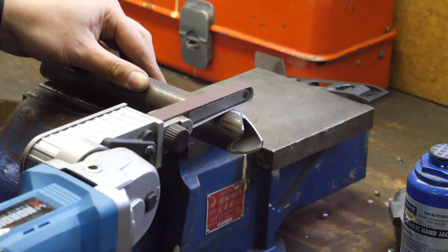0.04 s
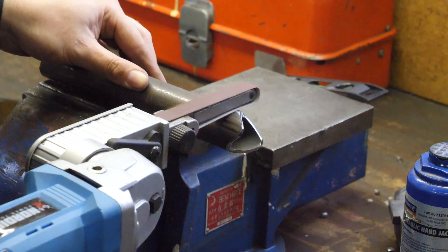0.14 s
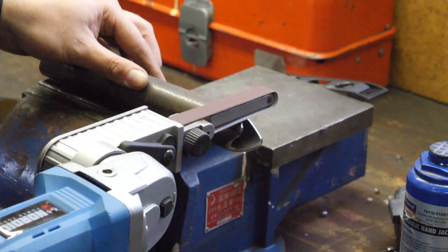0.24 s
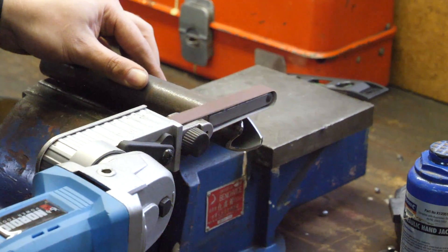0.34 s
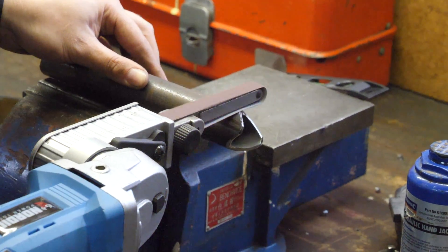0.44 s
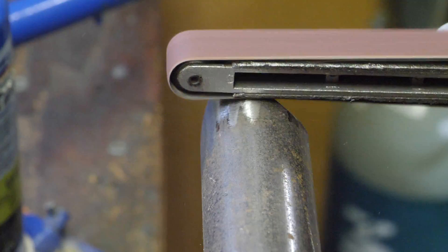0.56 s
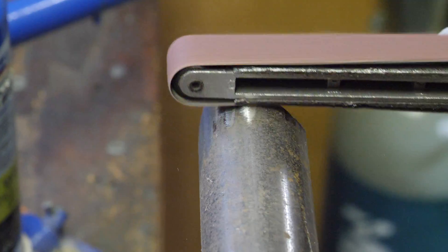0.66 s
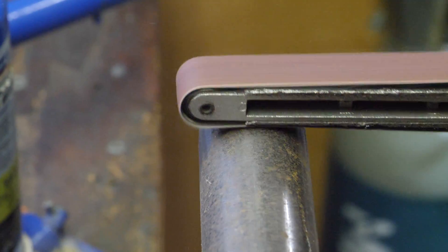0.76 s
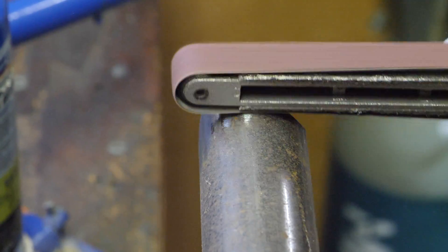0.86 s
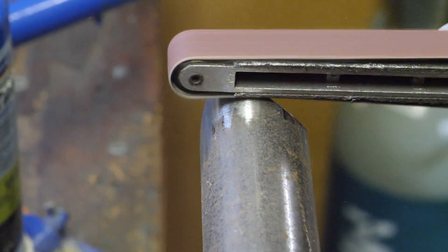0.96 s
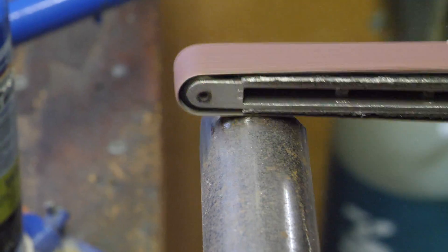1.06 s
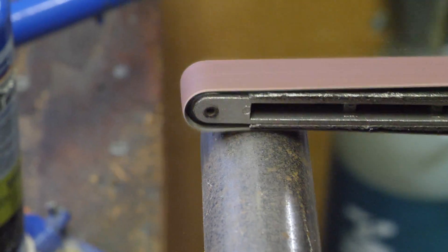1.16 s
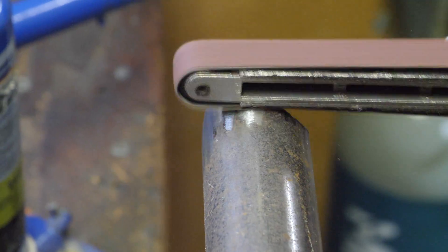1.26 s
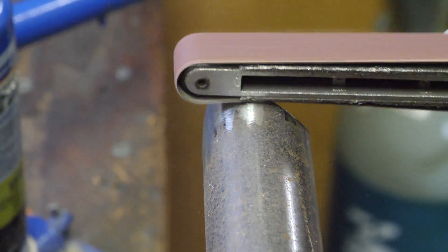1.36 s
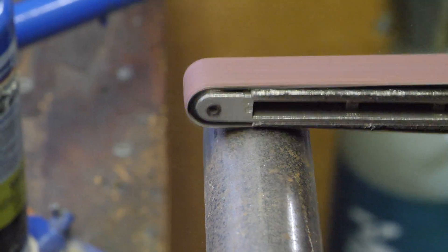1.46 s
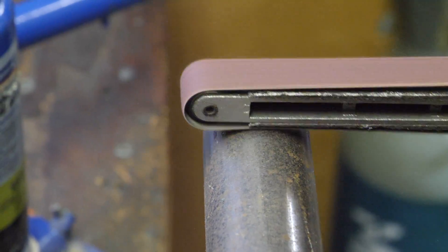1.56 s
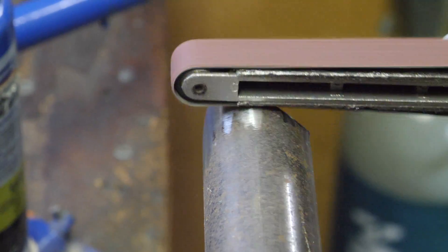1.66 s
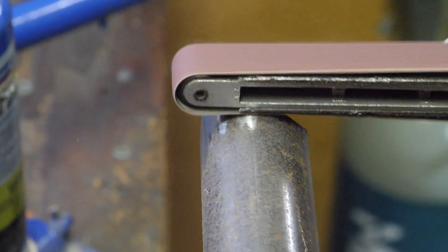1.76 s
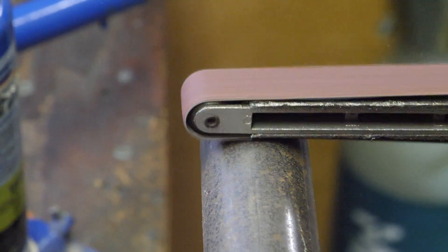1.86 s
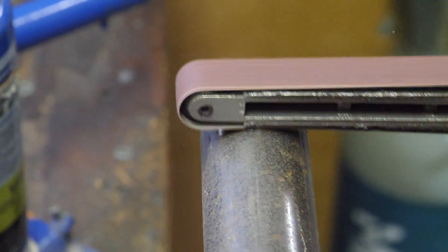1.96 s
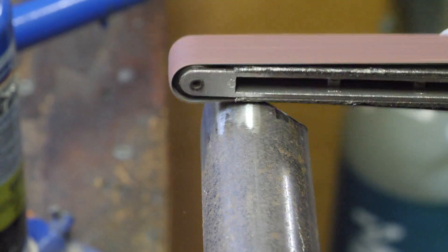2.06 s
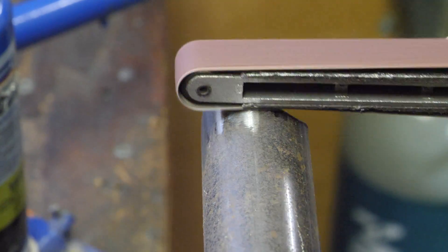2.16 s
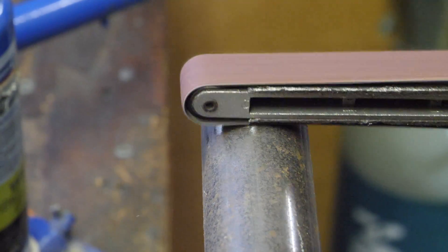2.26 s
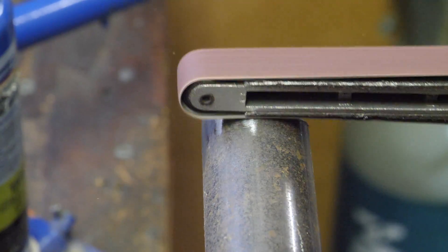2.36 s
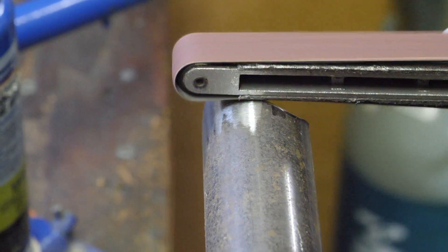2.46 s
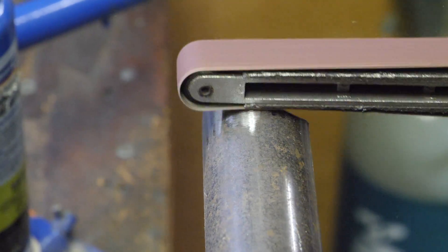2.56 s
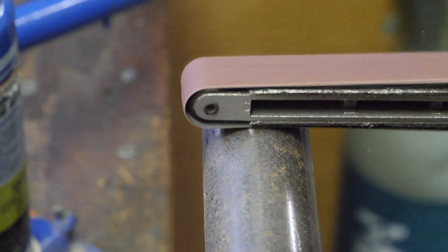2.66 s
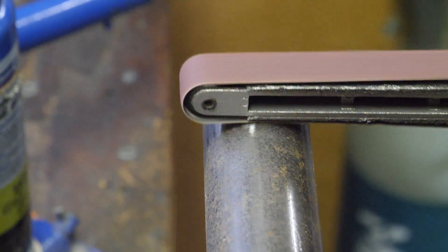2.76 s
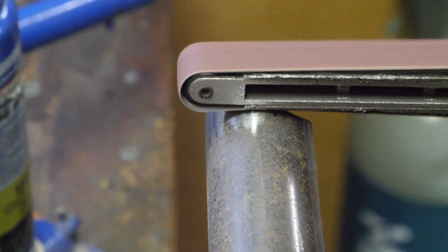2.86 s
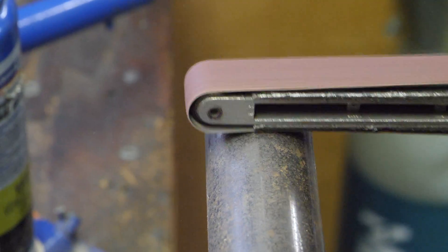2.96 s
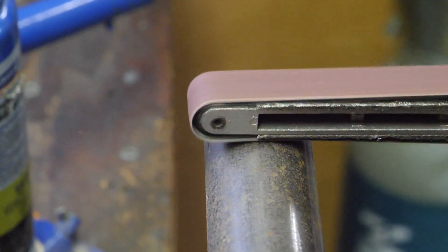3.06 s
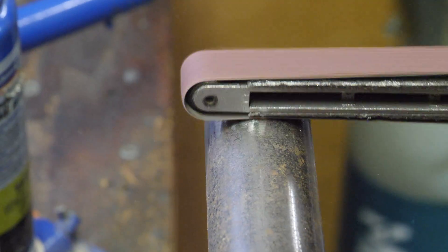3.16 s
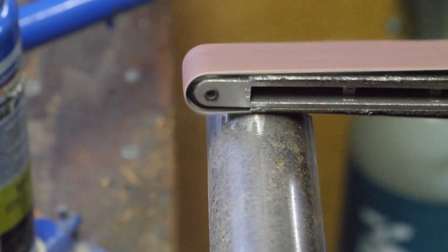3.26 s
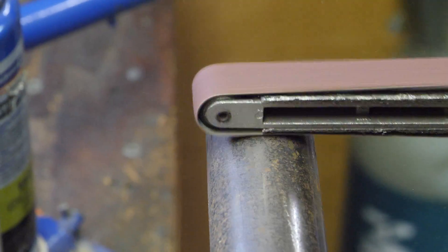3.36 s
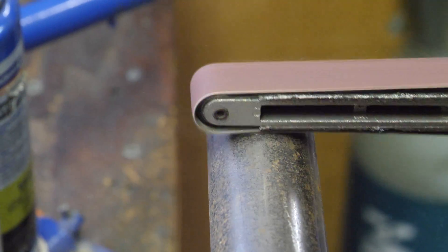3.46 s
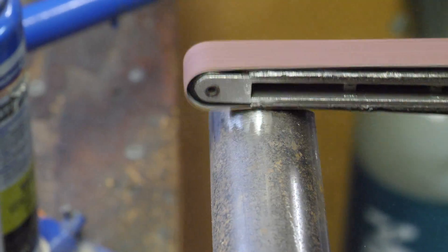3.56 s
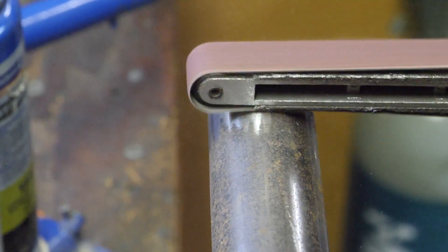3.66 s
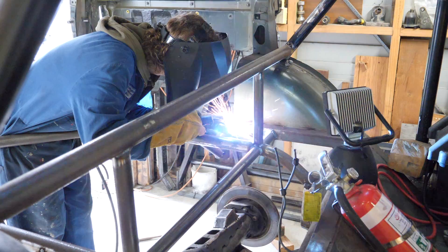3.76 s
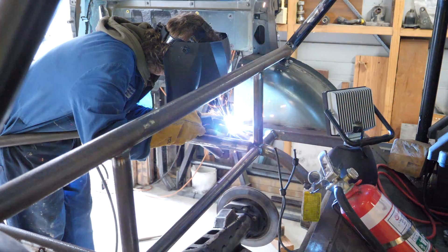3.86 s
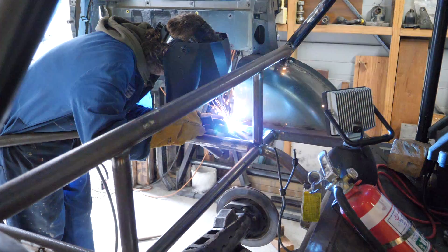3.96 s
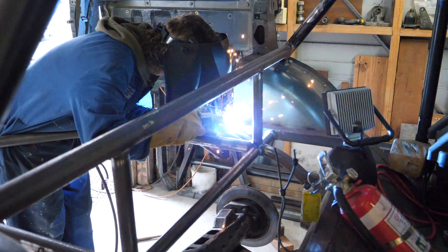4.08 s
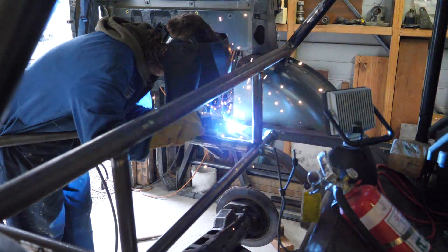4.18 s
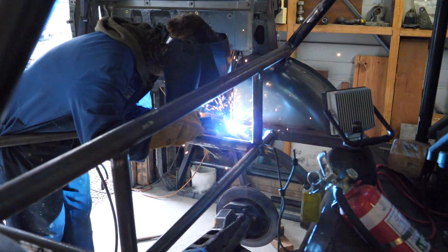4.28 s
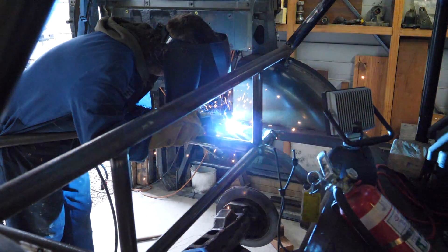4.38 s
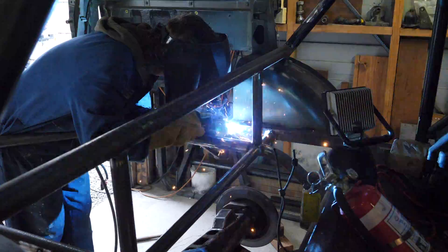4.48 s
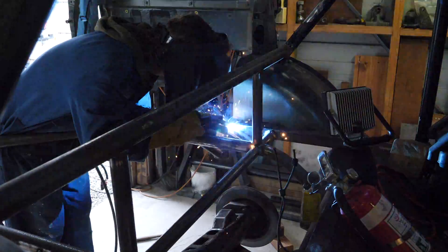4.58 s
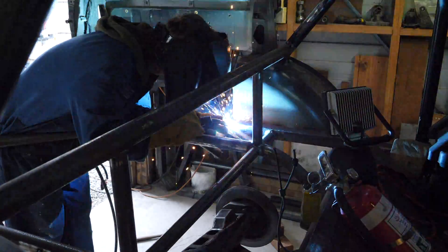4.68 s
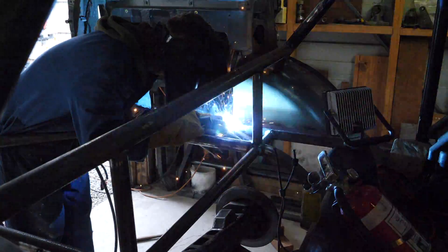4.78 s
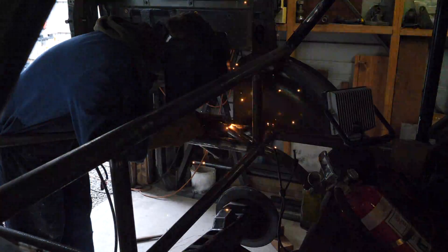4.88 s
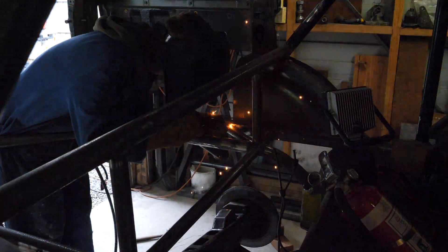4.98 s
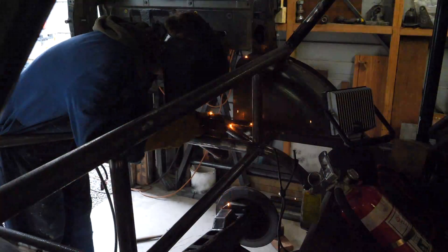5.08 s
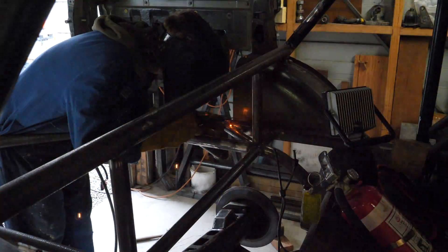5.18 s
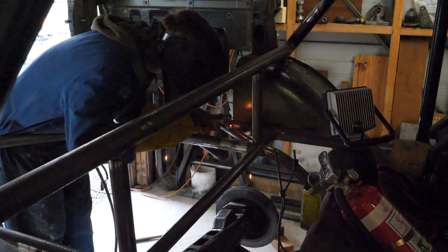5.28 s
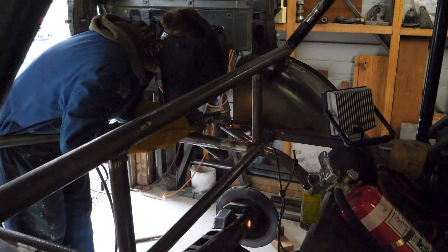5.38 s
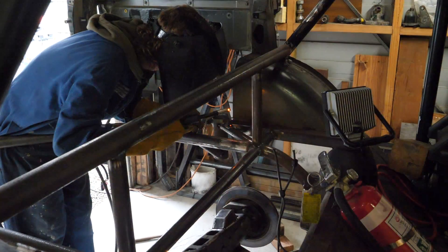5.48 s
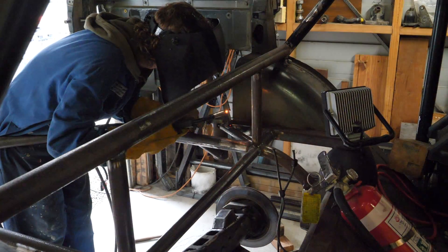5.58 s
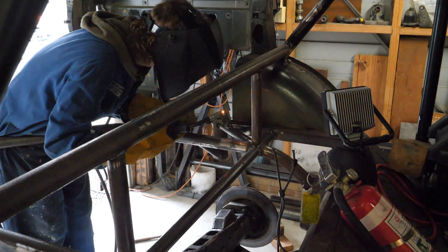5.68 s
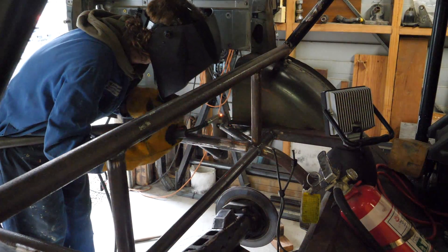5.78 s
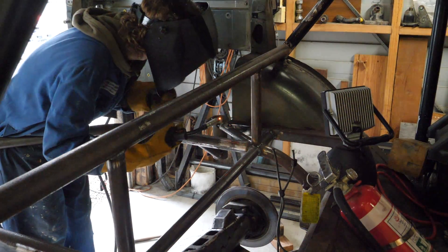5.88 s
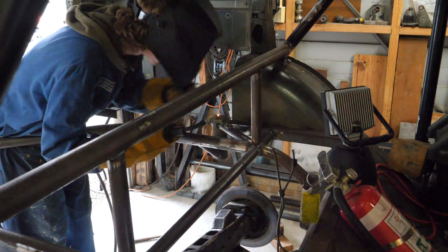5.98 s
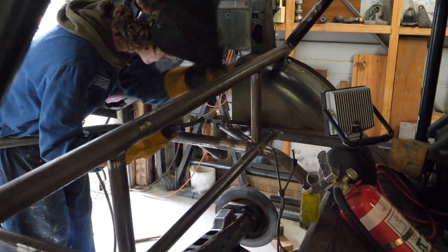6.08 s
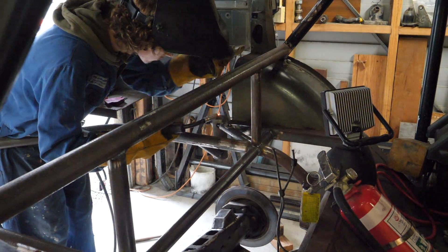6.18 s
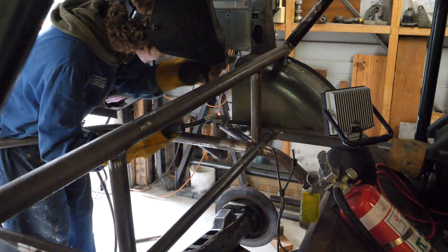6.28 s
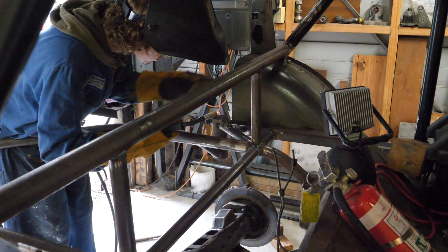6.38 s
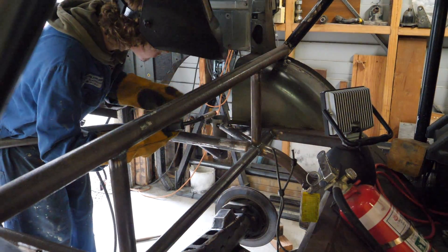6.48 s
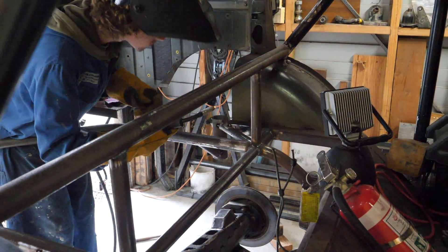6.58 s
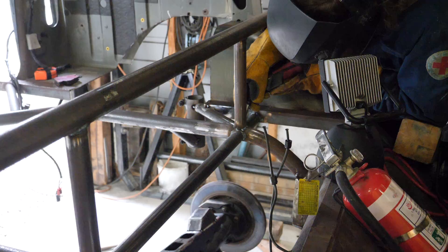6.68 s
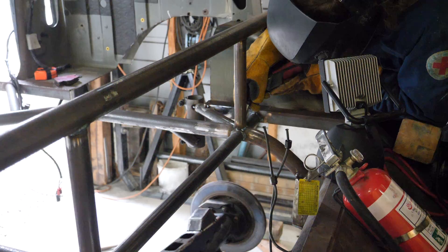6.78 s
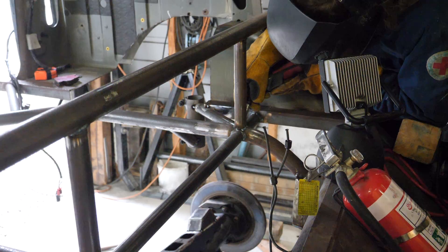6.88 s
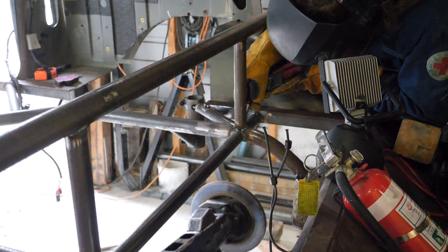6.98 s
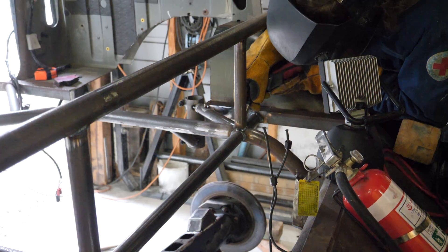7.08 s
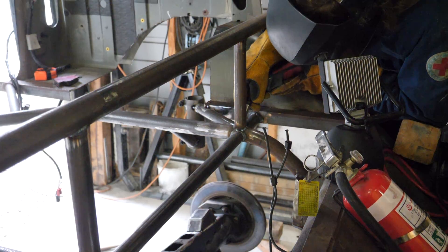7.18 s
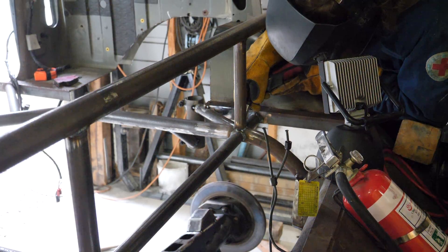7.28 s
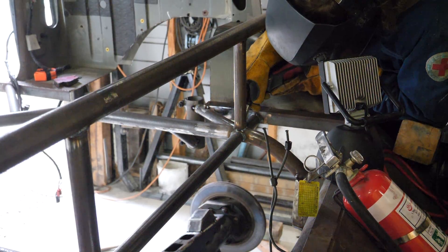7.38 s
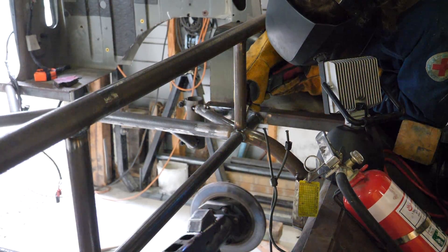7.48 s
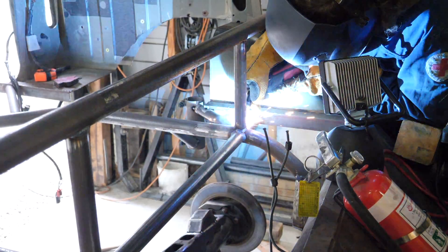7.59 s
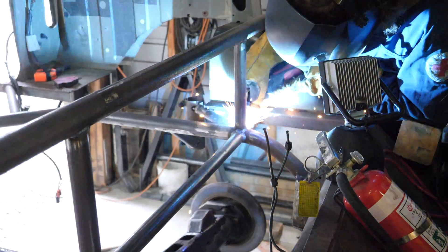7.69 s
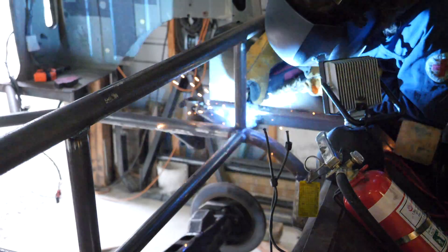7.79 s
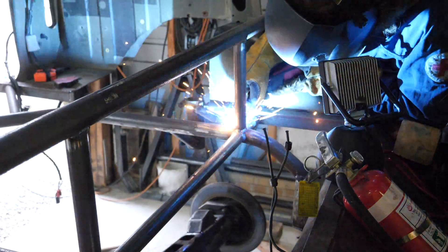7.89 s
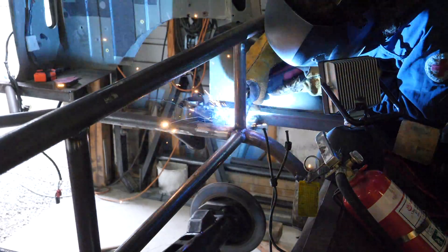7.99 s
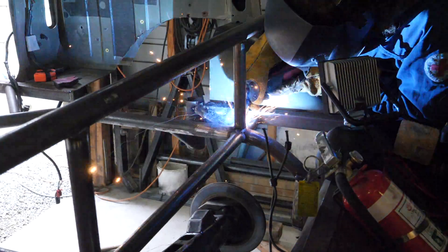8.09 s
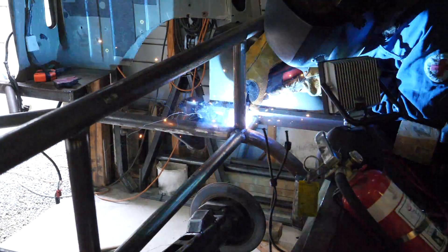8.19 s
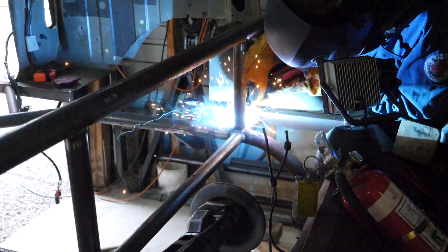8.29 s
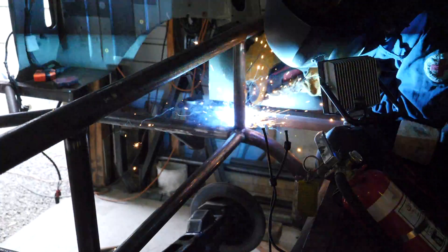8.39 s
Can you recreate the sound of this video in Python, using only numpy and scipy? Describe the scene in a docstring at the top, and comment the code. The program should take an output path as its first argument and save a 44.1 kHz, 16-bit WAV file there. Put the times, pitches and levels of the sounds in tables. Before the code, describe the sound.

From the start, an electric belt file runs close by on a steel tube, a high motor whine over a gritty rasp. It swells in strokes nearly three times a second, the tube singing out shrilly. The tone shifts at 0.5 seconds as the listening position moves to the tip. At 3.7 seconds the sanding cuts off. A puff of gas leads into a wire welder crackling from 3.8 to 4.9 seconds, with rapid hard pops and fine sizzle that slightly overload the microphone and echo briefly in the shed. A much quieter stretch follows: a cooling fan hums, and faint, whistling gas hisses until about 6 seconds, when the torch lightly knocks the metal frame. The fan continues alone until a soft scuff at 7.4 seconds. Gas surges again, and a second weld pops and sizzles from 7.5 seconds to about 8.5.

```python
"""Sanding and welding in a metal workshop.

An electric belt file, heard from two places in turn, rasps and whines on a steel tube and is cut off.
A wire welder then lays two short seams: each short circuit is a pop that rings the joint, echoes in
the shed and, if strong, overloads the microphone. A fan hums; between the seams gas hisses on and
the torch knocks and scuffs."""
import sys
import numpy as np
from scipy import signal
from scipy.fft import rfft, irfft
from scipy.io import wavfile
from scipy.ndimage import uniform_filter1d, minimum_filter1d, map_coordinates

SR = 44100
rng = np.random.default_rng(int(sys.argv[2]) if len(sys.argv) > 2 else 0)


def persist_wave(psi):
    """Save psi, clipped to +-1, as 16-bit WAV."""
    counts = np.round(np.clip(psi, -1, 1) * 32767).astype(np.int16)
    wavfile.write(sys.argv[1], SR, np.atleast_2d(counts).T)


N = 372204

MOVE_S, SANDER_END_S = .5, 3.714  # the listening place changes; the sanding stops
# strokes of the belt rocked over the tube: middle_s, length_s, bite_db
STROKES = [(0.358, .085, -22.5), (.64, .2, -32), (1.008, .13, -27), (1.39, .11, -27), (1.75, 0.097, -28.5),
           (2.132, .15, -24.5), (2.528, 0.1303, -26), (2.91, .16, -36), (3.29, .11, -33), (3.66, .11, -29)]


def belt_file():
    """Superposition of whine and abrasion, heard first from the side and then at the tip."""
    humps = np.array([hump(s, length) for s, length, _ in STROKES])
    push = humps.sum(0)
    bite = amp([db for _, _, db in STROKES]) @ humps
    tip = after(MOVE_S, fade=.024)
    turns = np.cumsum(motor_speed(push) * (1 + .00072 * wobble(20.57))) / SR
    tones = drive_whine(turns, tip) + tip * tube_song(turns, push)
    sanding = abrasion(turns, push, bite, tip)
    return (tones + sanding + bench_scatter(sanding)) * (1 - after(SANDER_END_S))


def motor_speed(push):
    """Inertia: the speed, in Hz, sags under load and recovers with a first-order lag."""
    free_hz, drag_hz, sag_hz, inertia_s = 535, 2.8, 3.5, .1003
    loss_hz = drag_hz * after(STROKES[0][0]) + sag_hz * push
    pole = np.exp(-1 / (inertia_s * SR))
    return free_hz - signal.lfilter([1 - pole], [1, -pole], loss_hz)


def drive_whine(turns, tip):
    """Rotational orders: armature, fan, gears and rollers sound at multiples of the motor speed."""
    # partials, in relative levels: multiple, side_db, tip_db
    orders = [(.4973, -64, -54.5), (1.279, -33.5, -35.5), (1.492, -51, -60), (1.644, -37, -32),
              (1.921, -58, -39.5), (2, -52, -39), (2.558, -42, -41), (3, -43, -46), (3.288, -50, -39.5),
              (3.5, -46, -46), (4.334, -45, -42.5), (5, -36, -34), (5.22, -46, -40), (6.525, -24.5, -47),
              (6.56, -47, -36), (7, -32, -29), (9, -52, -46), (9.267, -39, -41), (10.92, -50, -41)]
    whine = np.zeros(N)
    for multiple, side_db, tip_db in orders:
        level = amp(side_db + (tip_db - side_db) * tip + 1.64 * wobble(14) + 3)
        whine += level * np.sin(2 * np.pi * multiple * turns + .3 * wobble(30))
    return whine


def tube_song(turns, push):
    """Forced vibration: the tube sings at six times the motor speed, more in a stroke."""
    # the tube catches and sings out: middle_s, level_db
    catches = [(.61, -24), (.96, -20), (1.355, -19), (1.75, -24), (2.08, -25), (2.62, -19), (2.86, -23),
               (3.25, -20), (3.66, -20)]
    singing = amp(-29.5 + 2 * push + 3.6 * wobble(30))
    flares = sum(amp(db) * hump(s, length_s=.037) for s, db in catches)
    return np.hypot(singing, flares) * np.sin(2 * np.pi * 6 * turns + .4 * wobble(45))


def abrasion(turns, push, bite, tip):
    """Friction noise: countless grain impacts excite the resonances of tube and sanding arm."""
    # spectra of belt on steel and of grit hiss: frequency_hz, density_db
    rasp_side = [(30, -38), (100, -35), (200, -34.5), (380, -27), (520, -18.5), (680, -10), (1020, -9.5),
                 (2100, -12), (3420, -5), (4420, -7), (5580, -7.5), (15500, -34.5)]
    rasp_tip = [(30, -34), (100, -35), (200, -29.5), (385, -24.5), (510, -17.5), (610, -16), (670, -10.5),
                (890, -4.5), (1260, -8.5), (3270, -5), (3930, -5.5), (5080, -5.5), (15500, -25.5)]
    grit_tone = [(4000, -30), (7000, -3), (8000, -1.5), (9000, -2.5), (11000, 1), (13500, -2.5),
                 (15500, -1.5)]
    # resonances of tube and arm, and of the rim under a biting belt: centre_hz, width_hz, lift_db
    tube_side = [(700, 120, -0.5), (2106, 170, 10), (2380, 250, -7), (2750, 330, 6), (3480, 470, 3.5),
                 (5550, 250, 0.5)]
    tube_tip = [(509.6, 44, 4.5), (740, 90, 3.5), (940, 100, 3), (1300, 72, -2), (2600, 150, 3.5),
                (3160, 640, 5), (4520, 230, -4), (5000, 430, 2), (7070, 360, 6), (7530, 280, -2)]
    rim_ring = [(8030, 450, 9)]
    # the drive makes the contact pressure throb at half the motor's rate
    pressure = amp(1.7 * np.sin(np.pi * turns) + .58 * wobble(110))
    scrape = unit(grains(rate=14000, spread_db=3) * pressure)
    rasp = (1 - tip) * through(scrape, body(rasp_side, tube_side))
    rasp += tip * through(scrape, body(rasp_tip, tube_tip))
    # only the hard bites of the grit reach the top octave
    rasp = signal.sosfilt(signal.butter(2, 11000, fs=SR, output="sos"), rasp)
    grit = through(grains(rate=11000, spread_db=3) * pressure, body(grit_tone))
    rim = through(grains(rate=11000, spread_db=2) * pressure, body(grit_tone, rim_ring))
    return amp(-18.5 + push) * rasp + amp(-33.5 + 1.5 * tip) * grit + bite * rim


def bench_scatter(sound):
    """Scattering: bench and vice add a brief diffuse tail."""
    t, t60_s = np.arange(SR // 20) / SR, .057
    scatter = rng.standard_normal(len(t)) * amp(-60 * t / t60_s)
    return amp(-10) * through(sound, scatter / np.linalg.norm(scatter))


def welder():
    """Source and filter: two seams, heard from different sides, differ in colour and echoes."""
    # how each seam burns, in relative levels: time_s, sizzle_db, shorts_per_s, lesser_pop_db
    arc_a = [(3.81, -27, 70, -20), (3.96, -24.5, 62, -15), (4.1, -17.5, 60, -12.5), (4.17, -23, 35, -17),
             (4.3, -28, 63, -14.5), (4.48, -28, 55, -15), (4.7, -20.5, 58, -10.5), (4.78, -31, 60, -13),
             (4.87, -27.5, 55, -15)]
    arc_b = [(7.55, -15.5, 110, -16.5), (7.6, -15, 95, -13), (7.68, -29, 45, -17), (7.8, -26, 75, -14.5),
             (7.86, -32, 55, -10), (7.97, -30, 40, -17), (8.13, -31, 55, -13.5), (8.3, -29, 68, -11.5),
             (8.44, -29, 68, -14)]
    # spectrum of each seam: frequency_hz, density_db
    tone_a = [(30, -39), (120, -28.5), (270, -18), (440, -9), (700, -5.5), (1600, -3.5), (2600, -5.5),
              (5000, 0.5), (7000, -6.5), (11800, -3.5), (14000, -5), (16000, -9.5)]
    tone_b = [(30, -43), (120, -32), (250, -17.5), (380, -15.5), (480, -5.5), (620, -12.5), (1500, -6.5),
              (2500, -7.5), (3500, -3), (5000, -0.5), (8500, -8.5), (12000, -4.5), (16000, -9)]
    # resonances of nozzle and joint: centre_hz, width_hz, lift_db
    joint_a = [(504, 160, 2), (706, 130, 4), (1030, 120, -7), (2040, 118, -18), (3347, 250, 7.5),
               (3820, 300, -10.5), (4500, 450, 2), (5170, 450, 4.5), (7880, 520, 6.5), (10940, 520, 4),
               (11870, 650, 4.5), (15000, 2500, -3.5)]
    joint_b = [(957, 140, 10.5), (1510, 150, 4.5), (3460, 620, 8), (4070, 300, -12), (4980, 670, 8),
               (7940, 270, 4), (9700, 2200, -3), (11700, 770, -0.5), (14600, 3000, -3)]
    # reflections from frame, panels and floor: delay_s, gain_db
    echoes_a = [(.0013, -15.5), (.00205, -11.5), (.0037, -9), (.0045, -12.5), (.0063, -12), (.0075, -10),
                (0.019, -13)]
    echoes_b = [(.0036, -10), (.0051, -10), (.0068, -15.5), (.0164, -19.5)]
    first = seam((3.807, 4.885), arc_a, tone_a, joint_a, echoes_a,
                 pop_db=25.5, tick_db=2, sizzle_db=-5, room_db=-1.8, spread_s=.0016)
    second = seam((7.547, 8.45), arc_b, tone_b, joint_b, echoes_b,
                  pop_db=26, tick_db=-8, sizzle_db=-2, room_db=-3.5, spread_s=.0012)
    return first + second


def seam(span_s, arc, tone, joint, echoes, pop_db, tick_db, sizzle_db, room_db, spread_s):
    """Impulse excitation: the shorting wire bursts and rings the joint; fine spatter sizzles between."""
    # the tick of every short, however small: frequency_hz, density_db
    tick_tone = [(4000, -45), (9000, -16.5), (10800, -1), (12000, -1), (15000, -11)]
    times, levels_db = short_circuits(span_s, arc).T
    onsets = np.round(times * SR).astype(int)
    burning = after(span_s[0]) * (1 - after(span_s[1], fade=.02))
    bursts = through(np.bincount(onsets, amp(levels_db + pop_db), N)[:N], smear(spread_s))
    sizzle = burning * amp(curve(arc) + sizzle_db + 1.7 * wobble(90)) * grains(rate=3500, spread_db=1.5)
    ticks = amp(tick_db) * through(np.bincount(onsets, minlength=N)[:N], body(tick_tone))
    direct = through(bursts, body(tone, joint)) + ticks
    # sizzle and diffuse sound keep only part of the joint's colour
    mild = body(tone, [(hz, width, .49 * lift) for hz, width, lift in joint])
    walls = np.zeros(SR // 20)
    for delay, echo_db in echoes:
        walls[round(delay * SR)] += amp(echo_db)
    diffuse = amp(room_db) * through(through(bursts + sizzle, mild) + ticks, shed_tail())
    # what comes back from the shed has lost some treble
    dull = signal.butter(1, 12000, fs=SR, output="sos")
    return direct + through(sizzle, mild) + signal.sosfilt(dull, through(direct, walls) + diffuse)


def short_circuits(span_s, arc):
    """A quasi-periodic pulse train: rows of time_s, relative_db for hard pops and lesser ones between."""
    # the hardest shorts of the wire: time_s, relative_db
    pops = [(3.8071, -25.5), (3.824, -13), (3.9097, -9), (3.9277, -13.5), (3.9825, -7.5), (4.0499, -8.5),
            (4.0762, -7.5), (4.1118, -6), (4.1511, -7.5), (4.18, -8.5), (4.2044, -9), (4.2355, -11),
            (4.2652, -9.5), (4.2949, -9.5), (4.3417, -12), (4.3912, -11.5), (4.4303, -7), (4.5015, -9.5),
            (4.5219, -11.5), (4.5412, -8), (4.5796, -7.5), (4.607, -7.5), (4.6641, -2.5), (4.705, -8),
            (4.7344, -10.5), (4.7991, -6.5), (4.853, -7.5), (4.8728, -13.5), (7.5557, -15.5), (7.597, -9),
            (7.6583, -9.5), (7.698, -4.5), (7.7275, -14.5), (7.754, -9.5), (7.7835, -10), (7.8755, -13.5),
            (7.9029, -15), (7.936, -8), (7.9888, -7), (8.0221, -12), (8.0494, -13), (8.0694, -6),
            (8.109, -12), (8.1526, -9), (8.2182, -12.5), (8.2345, -12), (8.3017, -9), (8.3252, -6),
            (8.3596, -6.5), (8.4014, -7), (8.4095, -5.5)]
    # the wire burns back and no lesser pops come: start_s, end_s
    stalls = [(3.932, 3.982), (4.756, 4.799), (7.662, 7.697), (7.826, 7.874), (8.072, 8.151),
              (8.376, 8.401)]
    jitter, scatter_db = .12, 2  # jitter is a share of the spacing
    start, stop = span_s
    hard = [(s, db) for s, db in pops if start < s < stop]
    marks = [start] + [s for s, db in hard] + [stop]
    knots, _, rate, lesser_db = np.transpose(arc)
    lesser = []
    for a, b in zip(marks, marks[1:]):
        chance = rng.standard_normal(size=(24, 2))
        count = max(1, round((b - a) * np.interp((a + b) / 2, knots, rate)))
        for k, (late, loud) in zip(range(1, count), chance):
            s = a + (b - a) * (k + jitter * late) / count
            if not any(begin < s < end for begin, end in stalls):
                lesser.append((s, np.interp(s, knots, lesser_db) + scatter_db * loud))
    return np.array(hard + lesser)


def smear(spread_s, size=1024):
    """Dispersion: an all-pass response delays each band by up to spread_s."""
    knots = rng.random(61)
    delay = spread_s * np.interp(np.linspace(0, 1, size // 2 + 1), np.linspace(0, 1, len(knots)), knots)
    return irfft(np.exp(-2j * np.pi * np.cumsum(delay) * SR / size))


def shed_tail():
    """Reverberation: a diffuse response of energy 1 builds up, then decays exponentially in each band."""
    # decay of the shed: frequency_hz, t60_s
    decay = [(100, 0.26), (1000, 0.31), (5000, 0.2), (15000, 0.22)]
    hz, t, spectra = signal.stft(rng.standard_normal(SR // 2), SR, nperseg=256)
    tail = signal.istft(spectra * amp(-60 * t / along(decay, hz)[:, None]), SR, nperseg=256)[1]
    tail *= 1 - np.exp(-np.arange(len(tail)) / SR / .0025)
    return tail / np.linalg.norm(tail)


def gas():
    """Flow noise: stored pressure makes the shielding gas surge; narrow bands in it wander together."""
    # the gas valve: open_s, shut_s
    valve = [(3.7445, 6.06), (7.5125, 8.5)]
    # spectrum of the hiss: frequency_hz, density_db
    gas_tone = [(1000, -4.5), (2500, 1), (4000, -6.5), (5500, -0.5), (7500, -8), (9500, -8), (12300, -16.5),
                (13700, -11.5), (15500, -23)]
    # path of the whistle: time_s, pitch_hz
    pitch_path = [(4.98, 5450), (5.2, 5700), (5.3, 4980), (5.36, 5800), (5.55, 5400), (5.68, 5595),
                  (5.82, 5350), (6.05, 5500)]
    # bands of the whistle: multiple, relative_db
    bands = [(1, 2), (1.71, -11), (2.03, -15), (2.48, -18)]
    centre_hz = curve(pitch_path) * (1 + .02 * wobble(22))
    whistle, flow, surge_db = np.zeros((3, N))
    for multiple, db in bands:
        cycles = np.cumsum(multiple * centre_hz + 220 * wobble(700)) / SR
        whistle += amp(db) * unit(wobble(750) * np.sin(2 * np.pi * cycles))
    for opens, shuts in valve:
        flow += after(opens) * (1 - after(shuts, fade=.03))
        surge_db += 12.5 * after(opens) * np.exp(-np.abs(clock() - opens) / .12)
    whistle *= amp(-56.5 + 1.5 * wobble(14))
    rush = amp(-52.5 + surge_db + 1.1 * wobble(13)) * hiss(gas_tone)
    return flow * (whistle + rush)


def knocks():
    """Damped free vibration: the torch taps the tube frame, whose modes ring briefly."""
    # torch against frame: start_s, relative_db
    taps = [(5.951, -31), (5.969, -37)]
    # modes of the frame: pitch_hz, relative_db, t60_s
    modes = [(740, -2, .09), (990, 1.5, .07), (1480, 1, .05), (1640, -4, 0.051), (2550, -12, .04)]
    t = np.arange(SR // 4) / SR
    out = np.zeros(N)
    for s, db in taps:
        ring = sum(amp(level + rng.normal(0, 2) - 60 * t / t60) * np.sin(2 * np.pi * hz * t)
                   for hz, level, t60 in modes)
        crack = .49 * amp(-60 * t / .015) * hiss([(500, -4), (2500, 0), (9000, -25)])[:len(t)]
        out[round(s * SR):][:len(t)] += amp(db - 6.5) * (ring + crack)
    return out


def scuff():
    """Sliding friction: the torch scrapes into place before the second seam."""
    # spectrum of the scrape: frequency_hz, density_db
    scuff_tone = [(800, -21.5), (2000, -3.5), (3200, 2), (6000, -8), (8000, -20), (15000, -38.5)]
    start_s, hold_s, fall_db_per_s = 7.42, .03, 220
    fading_s = np.maximum(0, clock() - start_s - hold_s)
    level = after(start_s) * amp(-49.5 - fall_db_per_s * fading_s)
    return level * through(grains(rate=3000, spread_db=2), body(scuff_tone))


def fan():
    """Aerodynamic noise: the welder's cooling fan gives a broadband rush and a few unsteady tones."""
    # spectrum of the moving air: frequency_hz, density_db
    air_tone = [(25, -28), (90, -30), (140, -27.5), (180, -10), (290, -9), (345, -9), (460, -12.5),
                (720, -10.5), (1000, -14), (2130, -21.5), (2800, -24.5), (4000, -29.5), (6300, -35.5),
                (8000, -46.5), (15000, -62)]
    # tones of the fan: pitch_hz, relative_db
    tones = [(344.5, -57), (393.0, -59.5), (559.9, -60), (705.2, -58), (812.9, -60), (872.1, -60.5),
             (1077, -61), (1615, -62.5), (2611, -68.5)]
    air = amp(-45 + .7 * wobble(12)) * hiss(air_tone)
    hum = sum(amp(db + 3 + 2.5 * wobble(4)) * np.sin(2 * np.pi * hz * clock() + .58 * wobble(5))
              for hz, db in tones)
    return (air + hum) * after(SANDER_END_S)


def body(spectrum, resonances=(), size=4096):
    """Minimum-phase response of energy 1: a broad colour with Lorentzian peaks and dips in decibels."""
    hz = np.fft.rfftfreq(size, 1 / SR)
    peaks_db = sum(lift / (1 + (2 * (hz - centre) / width) ** 2) for centre, width, lift in resonances)
    cepstrum = irfft(np.log(amp(along(spectrum, hz) + peaks_db) + 1e-6))
    cepstrum[1:size // 2] *= 2
    cepstrum[size // 2 + 1:] = 0
    response = irfft(np.exp(rfft(cepstrum)))
    return response / np.linalg.norm(response)


def through(x, response):
    """Convolution of x with an impulse response."""
    return signal.oaconvolve(x, response)[:N]


def grains(rate, spread_db):
    """Shot noise of rms 1: rate impulses a second, very unequal in size."""
    when, size, polarity = rng.random((int(rate * N / SR), 3)).T
    heights = amp(spread_db * np.minimum(-np.log(1 - size), 5)) * np.sign(polarity - .5)
    return unit(np.bincount((when * N).astype(int), heights, N))


def hiss(spectrum):
    """Coloured noise of rms near 1."""
    return through(rng.standard_normal(N), body(spectrum))


def wobble(rate):
    """Smooth random modulation, rate knots a second."""
    knots = rng.standard_normal(int(N * rate / SR) + 4)
    coarse = np.arange(0, N + 16, 16)
    return np.interp(np.arange(N), coarse, map_coordinates(knots, [coarse * rate / SR]))


def hump(middle_s, length_s):
    """A raised-cosine pulse, above half height for length_s."""
    return np.cos(np.pi / 2 * np.clip((clock() - middle_s) / length_s, -1, 1)) ** 2


def after(s, fade=.003):
    """A ramp from 0 to 1, centred on s and lasting fade seconds."""
    return np.clip((clock() - s) / fade + .5, 0, 1)


def curve(rows):
    """The second column, interpolated over the times in the first."""
    times, values = np.transpose(rows)[:2]
    return np.interp(clock(), times, values)


def along(points, hz):
    """Interpolation of (frequency_hz, value) points on a log axis."""
    knots_hz, values = np.transpose(points)
    return np.interp(np.log(hz + 1), np.log(knots_hz + 1), values)


def clock():
    """The time of each sample in seconds."""
    return np.arange(N) / SR


def amp(db):
    """Decibels to gain."""
    return 10 ** (np.asarray(db) / 20)


def unit(x):
    """x at rms 1."""
    return x / np.sqrt(np.mean(x ** 2) + 1e-20)


def scene():
    """Superposition of all sources in one channel: sanding, then two welded seams."""
    return (welder() + belt_file() + gas() + knocks() + scuff() + fan())[None]


def record(dry):
    """Overload: a fast limiter holds the pops, saturation rounds them off, and the band is limited."""
    ceiling, hold_samples, hardness, top_hz = 1.25, 25, 8, 15800
    needed_gain = np.minimum(1, ceiling / (np.abs(dry) + 1e-9))
    limited = dry * uniform_filter1d(minimum_filter1d(needed_gain, hold_samples), hold_samples)
    clipped = limited / (1 + np.abs(limited) ** hardness) ** (1 / hardness)
    thinned = signal.sosfilt(signal.butter(1, 70, "high", fs=SR, output="sos"), clipped)
    lowpass = signal.firwin(401, top_hz, fs=SR)
    return signal.oaconvolve(thinned, lowpass[None], mode="same", axes=1)


dry = scene()
out = record(dry)
persist_wave(out)
```